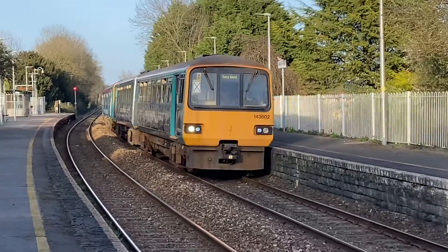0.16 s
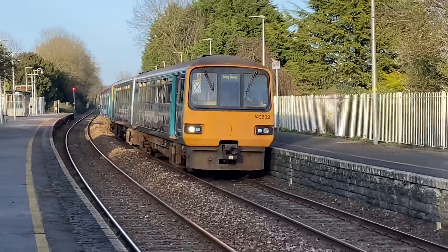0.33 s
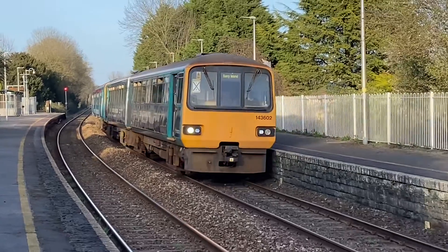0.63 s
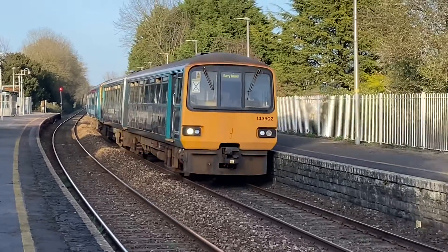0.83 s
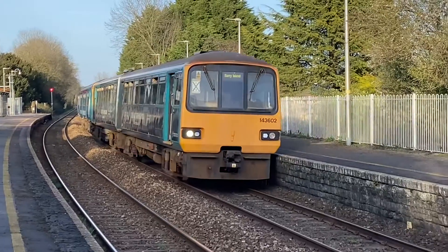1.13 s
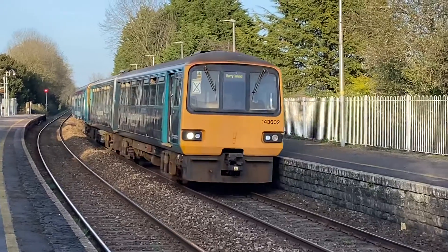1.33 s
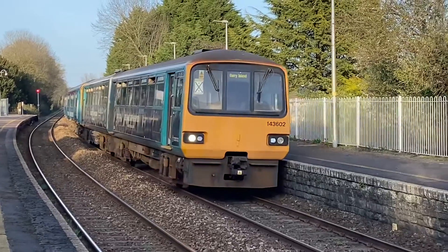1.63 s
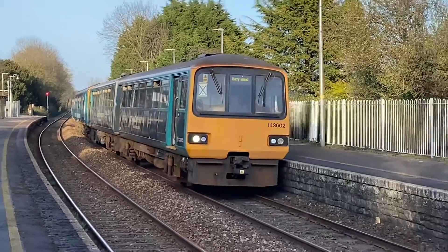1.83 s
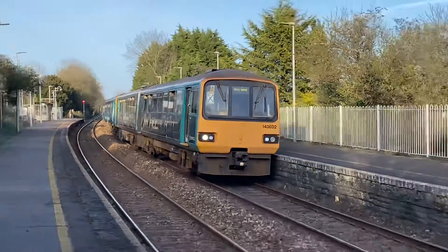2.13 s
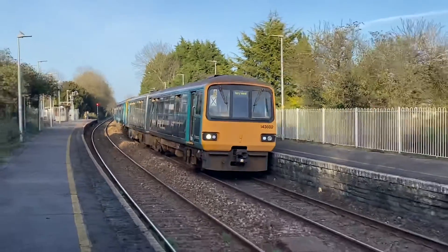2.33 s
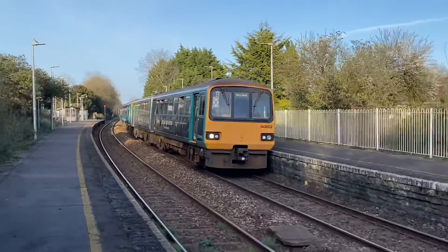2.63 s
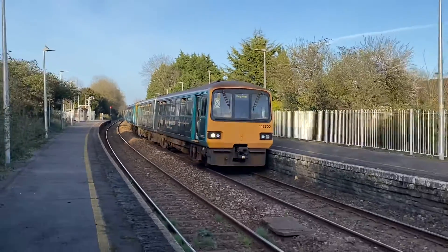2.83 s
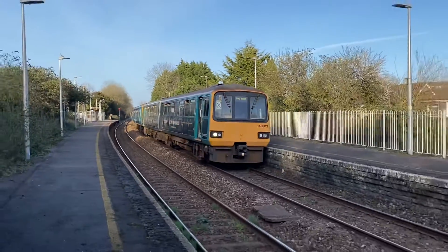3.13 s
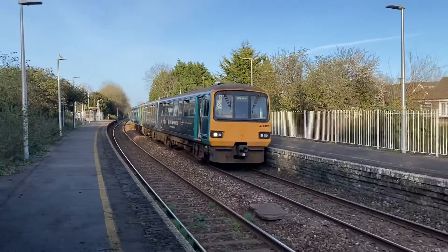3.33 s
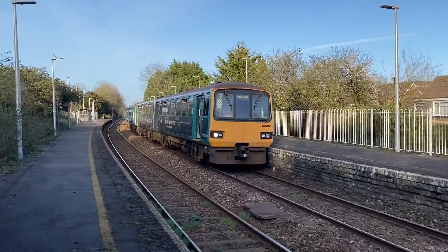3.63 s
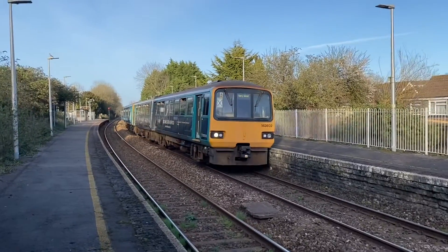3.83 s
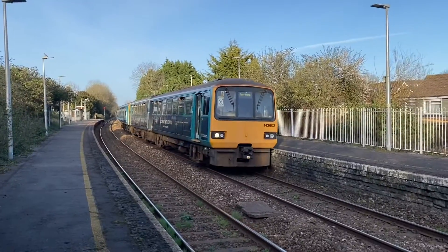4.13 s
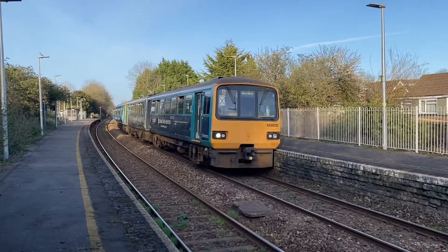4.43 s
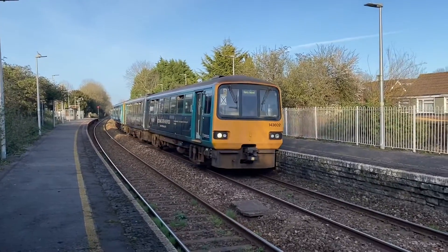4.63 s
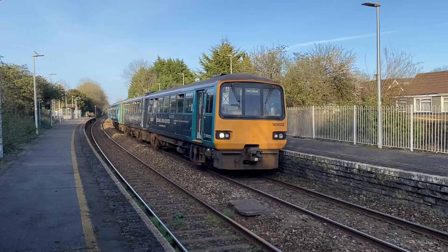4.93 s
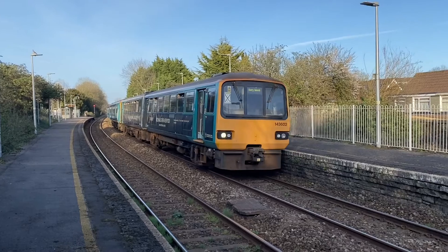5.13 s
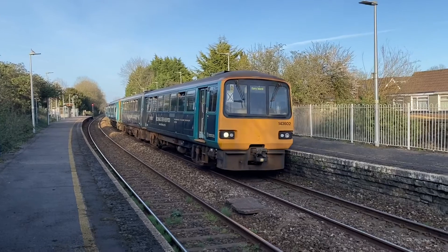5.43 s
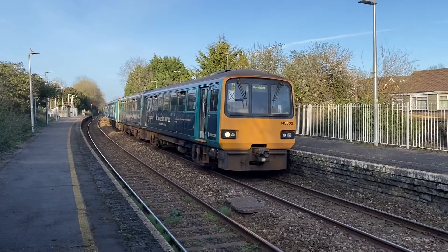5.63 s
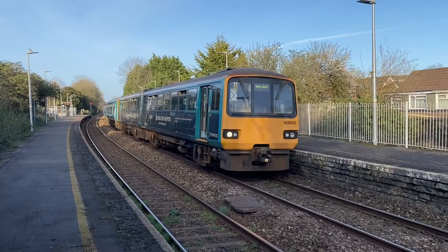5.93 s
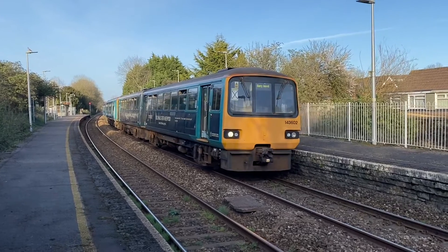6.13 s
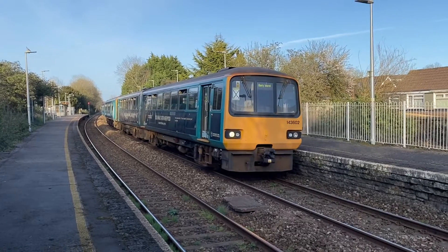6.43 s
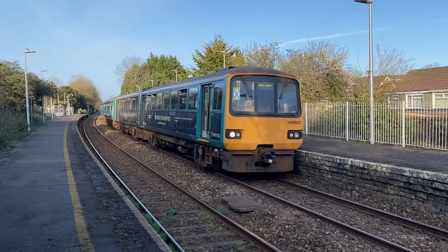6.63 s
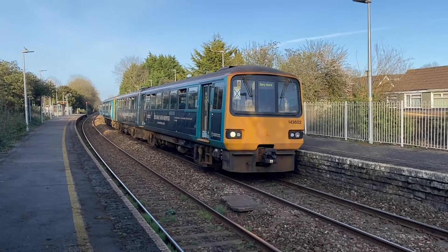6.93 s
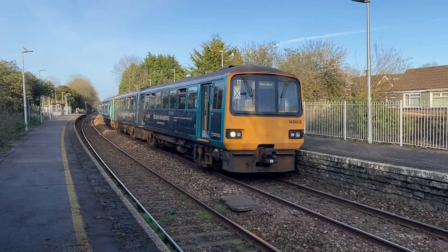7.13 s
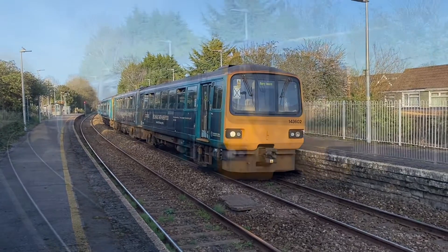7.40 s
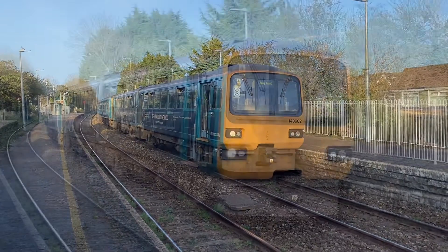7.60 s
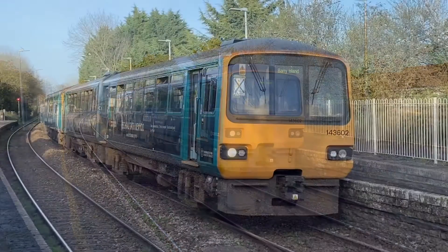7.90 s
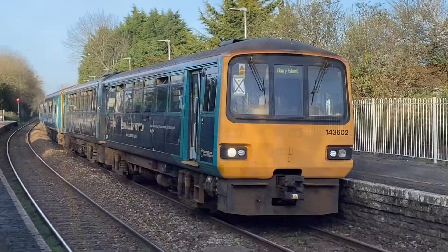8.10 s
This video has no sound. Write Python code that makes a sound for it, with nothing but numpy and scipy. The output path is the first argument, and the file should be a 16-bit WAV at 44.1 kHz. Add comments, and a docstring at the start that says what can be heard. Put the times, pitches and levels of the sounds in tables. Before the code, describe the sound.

A braking diesel train heard in stereo from the opposite platform. At first a high steady whistle trembles over deep rumble and soft airy rolling noise, while irregular metallic knocks ping down the rail. After a short quieter gap with faint groaning, several wheels shriek together, broken by rapid dropouts, raspy grit and hoarse stick-slip groans. The rumble sinks beneath this; the squeal gradually weakens to thin squeaks, and finally the low engine bed rises again.

```python
"""A diesel train brakes into a platform, heard across the tracks: coloured noise and firing hum give the engine
and rolling bed. From the start one wheel whistles as a noisy self-excited mode, and wheel knocks run ahead
along the rail as falling chirps, made by delayed resonators. From 3.3 s the brake blocks stick and slip in a
groan whose pitch falls overall; then several wheels sing at once, grit rasps in many brief modes, and single
modes squeak. A last slow rub hands over from one set of thin modes to another, and the rumble and roar of the
bed rise again at the end."""
import sys
import numpy as np
from scipy import signal
from scipy.fft import rfft, irfft
from scipy.io import wavfile
from scipy.ndimage import uniform_filter1d

SR = 44100
rng = np.random.default_rng(int(sys.argv[2]) if len(sys.argv) > 2 else 0)


def pcm_store(signal):
    """Save signal as 16-bit PCM."""
    levels = np.round(np.clip(np.atleast_2d(signal), -1, 1) * 32767)
    wavfile.write(sys.argv[1], SR, levels.astype(np.int16).T)


N = 364266
T = np.arange(N) / SR  # time in s
SIDES = np.array([[1], [-1]])  # left, right

# Engine and rolling levels, which drop abruptly under the loud squeal, sink further and later rise again.
# Each row: time in seconds, relative rumble level in dB, relative roar level in dB.
BED_LEVELS = [(0.0, -33.5, -52), (2.2, -33.5, -51), (2.9, -36, -50), (3.5, -32.5, -49.5),
              (4.72, -35.5, -47.5), (4.75, -40.5, -54), (5.7, -52.5, -60.5), (7.2, -47.5, -60.5),
              (7.91, -37.5, -49.5), (8.26, -33.5, -48)]
# Rumble and roar spectra. Each row: frequency in Hz, relative density in dB.
RUMBLE_SPECTRUM = [(21, -29.5), (36, -5), (70, 1.5), (157, -10), (242, -9), (315, -9.5), (401, -29),
                   (448, -21.5), (650, -43), (1100, -120)]
ROAR_SPECTRUM = [(150, 3), (500, -2), (1000, 0), (1800, -3), (3000, -7), (5000, -13.5), (8000, -24),
                 (12000, -23.5), (15500, -38.5)]
# Left-right likeness of the bed. Each row: frequency in Hz, likeness from 0 to 1.
LIKENESS = [(30, .55), (100, .72), (300, .72), (650, .4), (1400, .2), (2100, .95), (15000, .95)]
# Uneven firing hum. Each row: centre frequency in Hz, relative level in dB.
FIRING_HUM = [(48, -5.5), (77, -5.5), (127, -16)]

# First singing wheel, which swells and dies. Each row: time in seconds, level in dB.
FIRST_LEVELS = [(0.0, -32), (0.15, -30), (0.8, -28.5), (1.0, -24.5), (1.45, -24.5), (1.62, -20.5),
                (1.9, -23.5), (2.85, -25.5), (3.3, -33), (3.6, -55), (4.0, -71)]
FIRST_HZ = 5044
# Its overtones and half lines. Each row: multiple of the note, mean level against the note in dB.
FIRST_PARTIALS = [(1.5, -32), (2, -31), (2.5, -43), (3, -35)]
# Its dropouts. Each row: centre in seconds, depth in dB, half length in seconds.
FIRST_DIPS = [(0.5, 8, 0.15), (0.79, 5.5, 0.041), (2.53, 13, 0.059), (2.63, 16, 0.021), (3.08, 6, 0.1)]

# Wheel knocks heard through the rail. Each row: time in seconds, relative blow level in dB,
# gain of the modes above 500 Hz in dB.
WHEEL_KNOCKS = [(0.31, -19.5, -12.5), (0.61, -22.5, -7), (0.7, -28.5, -2), (0.91, -15, -13.5),
                (1.03, -21, -10.5), (1.061, -17.5, -13), (1.304, -9, -17.5), (1.368, -15, -11),
                (1.468, -18.5, -21), (1.59, -20, -12), (1.703, -12.5, -19.5), (1.77, -16.5, -17.5),
                (2.085, -18, -24), (2.271, -18.5, -24), (3.387, -11, -17.5), (3.594, -15, -15),
                (3.692, -20, -8), (4.209, -21.5, -13)]
# Rail modes. Each row: frequency in Hz, nominal width in Hz, relative gain in dB, relative arrival in ms.
RAIL_MODES = [(269.3, 47, -13.5, 43.2), (381.3, 77, -7.5, 14), (608, 91, 1, 5.99), (786, 74, -5, 4.92),
              (937, 63, -6.5, 3.93), (1113, 84, -5.5, 3.01)]

# Lower wheel note, faint at first. Each row: time in seconds, level in dB.
LOWER_LEVELS = [(0.1, -55), (1.0, -46), (3.3, -50), (3.62, -43), (3.75, -47), (4.15, -47), (4.3, -52),
                (5.0, -42), (6.4, -37), (6.78, -32), (6.95, -39), (7.5, -44), (7.62, -55), (8.05, -60)]
# Its pitch. Each row: time in seconds, frequency in Hz.
LOWER_GLIDE = [(0, 5405), (4.3, 5405), (5.5, 5388), (7, 5383)]
# Loudest wheel note, which catches and then sinks. Each row: time in seconds, level in dB.
MAIN_LEVELS = [(4.12, -50), (4.335, -42.5), (4.35, -24.5), (4.46, -19), (4.7, -25), (4.73, -11),
               (4.78, -17), (5.7, -21), (6.3, -22.5), (6.55, -41.5), (6.78, -23), (7.4, -32.5), (7.65, -73),
               ]
# Its pitch. Each row: time in seconds, frequency in Hz.
MAIN_GLIDE = [(4.1, 5450), (4.3, 5503), (5.1, 5487), (6.5, 5479), (7.8, 5472)]
# Its dropouts. Each row: centre in seconds, depth in dB, half length in seconds.
MAIN_DIPS = [(4.6, 10.5, 0.055), (5.06, 17, 0.015), (5.39, 15.5, 0.091), (5.68, 6, 0.035),
             (5.83, 13, 0.061), (6.04, 10, 0.072), (6.22, 14, 0.077), (6.44, 24, 0.043), (6.7, 22, 0.012),
             (6.85, 9, 0.056), (7.01, 28, 0.045), (7.2, 6.5, 0.087)]
# Middle wheel note. Each row: time in seconds, level in dB.
MIDDLE_LEVELS = [(6.3, -41), (6.68, -41), (6.74, -28.5), (7.1, -32.5), (7.3, -35), (7.55, -34), (7.8, -61)]
MIDDLE_HZ = 5432
# Its dropouts. Each row: centre in seconds, depth in dB, half length in seconds.
MIDDLE_DIPS = [(7.2, 21, 0.033), (7.41, 9, 0.12)]

# Bites of the blocks. Each row: start of hold in seconds, hold in seconds, then relative levels in dB
# of groan, lower caught mode, upper caught mode and scrape.
BLOCK_BITES = [(3.428, .01, -46, -95, -95, -95), (4.012, 0.0093, -47, -95, -95, -95),
               (4.169, 0.014, -41.5, -100, -84, -95), (4.265, 0.025, -31, -97, -95, -95),
               (4.611, 0.18, -27.5, -39, -58, -62), (4.811, 0.06, -44, -24, -37, -38.5),
               (4.896, 0.053, -45, -27, -40, -50), (5.001, 0.085, -36.5, -29.5, -35, -38),
               (5.101, 0.15, -41.5, -31, -32.5, -38), (5.288, 0.17, -42, -44.5, -57, -47),
               (5.489, 0.086, -42.5, -38, -33.5, -40.5), (5.596, 0.23, -41, -34, -33.5, -39),
               (5.796, 0.18, -41.5, -42, -38.5, -44.5), (6.131, 0.15, -47, -47, -43.5, -49.5),
               (6.232, 0.14, -44.5, -47.5, -33.5, -47), (6.423, 0.072, -46.5, -49, -35.5, -48),
               (6.581, 0.063, -48.5, -79, -39.5, -57.5), (6.733, 0.075, -49.5, -44, -35.5, -47),
               (6.853, 0.14, -51, -55, -45, -46.5), (6.971, 0.086, -49.5, -48, -37, -46.5),
               (7.151, 0.095, -53, -76, -59, -54.5), (7.327, 0.15, -56, -70, -85, -56)]
# Slopes in dB per s for groan, lower mode, upper mode and scrape
BITE_RISE_DB_S, BITE_SAG_DB_S, BITE_FALL_DB_S = (395, 405, 300, 120), (27, 44, 16, 10), (453, 200, 296, 95)
# Groan pitch. Each row: time in seconds, mean slip rate in Hz.
SLIP_RATE = [(3.4, 1465), (4.6, 1433), (5.8, 1355), (6.1, 1257), (6.6, 1197), (6.9, 1249), (7.4, 1200)]
# Groan harmonics. Each row: multiple of the slip rate, relative level in dB.
GROAN_PARTIALS = [(1, 4), (2, -4), (3, -7), (5, -17.5)]
MURMUR_DB, MURMUR_S = -63, (3.3, 7.9)  # least groan level between bites; from, to
SLOW_FROM_S = 6.0  # the train counts as slow from here
BITE_SHARP, BITE_SETTLE_S = .04, .12  # once slow, pitch excess as a share; settling time
SLOW_OCTAVE_DB = 7  # boost of the groan's octave once slow

SCRAPE_S = (4.5, 7.7)  # flares start within this span
# Strong wheel modes: frequencies in Hz, and their relative levels in dB.
STRONG_HZ = (2170, 3208, 3860, 4592, 5017, 6897, 7144, 7499, 8204, 9270, 9652, 10261, 11332, 12339, 13650,
             14153, 15095)
STRONG_DB = (-4.5, -2, -7, -10, 2.5, 9.5, -3.5, -6, 7, -14, 7, -7, -8.5, -3, -7, -8, -9.5)
# Lower and upper caught mode: mean frequencies in Hz.
CAUGHT_HZ = (2748, 4090)
HALF_MODE_DB = (0, -13)  # the lower caught mode at half pitch, against the mode: slow, before
# Low modes of the brake gear: mean frequencies in Hz.
GEAR_HZ = (590, 735, 895)

# Squeaks. Each row: centre in seconds, centre frequency in Hz, level at the peak in dB.
SQUEAKS = [(7.03, 5028, -40), (5.39, 3275, -38), (5.46, 3275, -42), (5.53, 3210, -37), (5.0, 892, -45),
           (5.53, 690, -51), (5.79, 580, -48), (6.6, 600, -53)]
SQUEAK_S, SQUEAK_RISE_HZ_S = 0.027, 700  # time from peak to 1/e; upward bend

# Last slow rub. Each row: time in seconds, relative level of the first mode set in dB, of the second in dB.
RUB_LEVELS = [(6.15, -80, -77), (6.27, -78, -57), (6.63, -62, -59), (6.84, -41, -53), (7.02, -42, -51),
              (7.1, -53, -38.5), (7.27, -67, -43.5), (7.38, -48, -47.5), (7.6, -75, -61.5)]
# The two mode sets: frequencies in Hz, and their relative levels in dB.
RUB_HZ = ((883, 2277, 3160), (2245, 3187, 5028))
RUB_DB = ((-14, 0, -1), (-2, 0.0025, 0.5))

# Phase between the microphone ports. Each row: frequency in Hz, lead of the left port in radians.
PORT_LEAD = [(7300, 0), (8400, -2.8), (9700, -3.6), (10700, -6.1), (11800, -6.5), (12900, -9.4),
             (13900, -9.5), (14600, -12.3), (15500, -12.6)]
TOP_HZ = 15700  # edge of the treble cut


def undb(db):
    """Amplitude ratio is ten to the power of dB over twenty."""
    return 10 ** (np.asarray(db) / 20)


def unit(x):
    """Normalisation to a root mean square of 1."""
    return x / np.sqrt(np.mean(np.abs(x) ** 2))


def curve(rows, fade_s=0.02):
    """Linear interpolation of table columns over time, followed by a gate that closes outside the table."""
    s, *columns = np.transpose(rows)
    inside_s = np.minimum(T - s[0], s[-1] - T)
    gate = np.clip(inside_s / fade_s + 1, 0, 1)
    return [np.interp(T, s, column) for column in columns] + [gate]


def on_log(table, hz):
    """Interpolation of a table on a logarithmic frequency axis."""
    f, values = np.transpose(table)
    return np.interp(np.log(np.maximum(hz, 1)), np.log(f), values)


def walk(rate_hz):
    """Random modulation: held random steps, twice smoothed, with rms 1."""
    k = int(SR / rate_hz)
    held = np.repeat(rng.standard_normal(N // k + 1), k)
    return unit(uniform_filter1d(uniform_filter1d(held, k), k)[:N])


def turns(hz):
    """Phase is the integral of frequency: a rotating complex phasor."""
    return np.exp(2j * np.pi * np.cumsum(hz * np.ones(N)) / SR)


def fuzz(width_hz, size=8):
    """Narrow-band noise: a double pole gives complex noise, rms 1, with steep skirts."""
    pole = np.exp(-2 * np.pi * width_hz * size / SR)
    white = rng.standard_normal((2, N // size + 2))  # drawn every size samples
    slow = signal.lfilter([1], [1, -2 * pole, pole ** 2], white[0] + 1j * white[1])
    return unit(np.interp(np.arange(N) / size, np.arange(len(slow)), slow))


def sing(hz, rough, skirt_hz, wide=0.):
    """Self-excited oscillation, rms 1: a line with a noisy skirt, whose echoes fade apart on the two sides."""
    swing = (1 + rough * fuzz(skirt_hz)) / np.sqrt(1 + rough ** 2)
    if wide:
        swing = swing * (1 + wide * fuzz(21) * SIDES) / np.sqrt(1 + wide ** 2)
    swing = swing / np.sqrt(1 + np.abs(swing) ** 2 / 4)  # friction caps the swing
    return unit(np.imag(turns(hz) * swing))


def ring(x, hz, width_hz):
    """Resonance of gain 1 at its centre."""
    return signal.lfilter(*signal.iirpeak(hz, hz / width_hz, fs=SR), x)


def gaps(rows):
    """Amplitude modulation by V-shaped dips, as dB lost."""
    return sum(db * np.clip(1 - np.abs(T - s) / half_s, 0, 1) for s, db, half_s in rows)


def bed(spectrum, flicker_db, flicker_hz):
    """Coloured noise, rms 1, from partly coherent sides and octave bands that flicker independently."""
    hz = np.fft.rfftfreq(N, 1 / SR)
    alike = np.clip(on_log(LIKENESS, hz), 0, 1)
    coloured = rfft(rng.standard_normal((2, N))) * undb(on_log(spectrum, hz))
    mid, side = coloured * np.sqrt([1 + alike, 1 - alike])
    both = mid + SIDES * side
    octave = np.clip(np.log2(np.maximum(hz, 1) / 40), 0, 8)
    out = 0
    for k in range(9):
        share = np.clip(1 - np.abs(octave - k), 0, 1)
        out = out + undb(flicker_db * walk(flicker_hz)) * irfft(both * share, N)
    return unit(out)


def engine_and_rolling():
    """Broadband radiation: rumble with wavering firing lines, and rolling roar, under level curves
    that drop abruptly at 4.72 s, sink further and later rise again."""
    rumble_db, roar_db, _ = curve(BED_LEVELS)
    hum = sum(undb(db) * sing(hz + 3 * walk(2.5), rough=0.92, skirt_hz=4.9, wide=0.14)
              for hz, db in FIRING_HUM)
    rumble = undb(-2.5) * bed(RUMBLE_SPECTRUM, flicker_db=1.5, flicker_hz=8)
    roar = bed(ROAR_SPECTRUM, flicker_db=1.03, flicker_hz=12)
    return undb(rumble_db) * (rumble + hum) + undb(roar_db + 7.5 + 0.36 * SIDES) * roar


def first_wheel():
    """Beating of near lines: a whistle flutters against a rough twin just above, with weak partials."""
    db, gate = curve(FIRST_LEVELS)
    db = db - gaps(FIRST_DIPS)
    rough = np.clip(.2 + (db.max() - db - 4) / 17, .25, 1.2)  # the weaker, the more it stutters
    tone = sing(FIRST_HZ, rough, skirt_hz=21.8, wide=0.096)
    twin = sing(FIRST_HZ + 52, rough=1.7, skirt_hz=30)
    tone = tone + undb(-12.0 + 2.2 * walk(9)) * twin
    for k, partial_db in FIRST_PARTIALS:
        partial = sing(k * FIRST_HZ, rough=1.3, skirt_hz=30 * k)
        tone = tone + undb(partial_db + 2.0 * walk(14)) * partial
    return gate * undb(db) * tone


def knocks(clatter_db=-37, clatter_until_s=4.6, crunch_s=0.029, crunch_db=-3):
    """Dispersion of bending waves: crunchy blows ring the rail, and its high modes arrive first."""
    # Small blows patter between the knocks; two weaker blows crowd around each knock.
    small = rng.random((320, 3)) * [clatter_until_s, 6, 6] + [0, clatter_db, -16]
    scatter = rng.random((2 * len(WHEEL_KNOCKS), 3)) * [.12, -7, -4] + [-.015, -6, 0]
    rebounds = np.repeat(WHEEL_KNOCKS, 2, axis=0) + scatter
    s, blow_db, bright_db = np.vstack([WHEEL_KNOCKS, rebounds, small]).T
    chance = rng.standard_normal((len(s), len(RAIL_MODES)))
    out = np.zeros((2, N))
    for (hz, nominal_hz, db, ms), spread in zip(RAIL_MODES, chance.T):
        kicks = np.zeros(N)
        at = np.clip(((s + (ms - 14) / 1000) * SR).astype(int), 0, None)
        kicks[at] = undb(blow_db + db + (hz > 500) * bright_db + 2.0 * spread) * np.sign(spread)
        fading = signal.lfilter([1], [1, -np.exp(-1 / (crunch_s * SR))], kicks)
        fading = fading * np.sqrt(2 / (crunch_s * SR))
        crunch = kicks + undb(crunch_db) * fading * rng.standard_normal(N)
        # the rail runs past the left port first
        ports = np.array([crunch, np.roll(crunch, int(0.00029 * SR))])
        width_hz = 0.92 * nominal_hz
        out += ring(ring(ports, hz, width_hz), hz, width_hz) * SR / (4 * nominal_hz)
    return out * undb(0.48 * SIDES)


def singing_wheels(scrape_db):
    """Friction-driven wheel modes: three close notes clear up as the train slows; scraping lifts their octaves."""
    hurry = np.clip((6.1 - T) / 0.67, .3, 1)
    harder_db = 0.36 * np.maximum(scrape_db - scrape_db.max(), -30)
    # levels, dB lost, pitch in Hz, roughness, octave dB, lean to the left in dB
    wheels = [
        (LOWER_LEVELS, 2.76 * walk(13), curve(LOWER_GLIDE)[0], .9, -12, 2.2),
        (MAIN_LEVELS, gaps(MAIN_DIPS), curve(MAIN_GLIDE)[0], 1.1, -14, 0.),
        (MIDDLE_LEVELS, gaps(MIDDLE_DIPS), MIDDLE_HZ, .6, -20, 2.2)]
    out = 0
    for levels, lost_db, hz, rough, octave_db, left_db in wheels:
        db, gate = curve(levels)
        note = sing(hz, rough * hurry, skirt_hz=23.0, wide=0.58)
        octave = undb(octave_db + harder_db) * sing(2 * hz, rough * hurry, skirt_hz=27, wide=.1)
        lean_db = left_db * (1 - hurry) * SIDES
        out = out + gate * undb(db - lost_db + lean_db) * (note + octave)
    return out


def bites():
    """Stick-slip envelopes in dB for groan, caught modes and scrape: each rises, sags in its hold, then falls."""
    rise, sag, fall = (np.array(v)[:, None] for v in (BITE_RISE_DB_S, BITE_SAG_DB_S, BITE_FALL_DB_S))
    out, t = -120., T[::64]
    for s, hold_s, *db in BLOCK_BITES:
        before_s = np.clip(s - t, 0, None)
        held_s = np.clip(t - s, 0, hold_s)
        after_s = np.clip(t - s - hold_s, 0, None)
        lost = rise * before_s + sag * held_s + fall * after_s
        out = np.maximum(out, np.array(db)[:, None] - lost)
    return [np.interp(T, t, row) for row in out]


def stutter(depth_db=5, rate_hz=30):
    """Intermittent contact: the level in dB of a contact that keeps letting go for an instant."""
    return depth_db * np.minimum(walk(rate_hz), .5)


def groan(bite_db):
    """Stick-slip harmonics of a wavering, mostly falling slip rate; the first faint slips are purer."""
    murmuring = (T > MURMUR_S[0]) & (T < MURMUR_S[1])
    db = np.maximum(bite_db, np.where(murmuring, MURMUR_DB, -120))
    slow, early = T > SLOW_FROM_S, T < 4.5
    starts = np.array(BLOCK_BITES)[:, 0] - .03
    latest = np.clip(np.searchsorted(starts, T) - 1, 0, None)
    since_s = np.abs(T - starts[latest])
    waver = np.where(T > 4.85, 0.009, 0.004) * walk(30)
    sharp = slow * BITE_SHARP * np.exp(-since_s / BITE_SETTLE_S)
    hz = curve(SLIP_RATE)[0] * (1 + waver + sharp)
    rough = np.where(slow, 1.1, np.where(early, 0.7, 2.7))
    slips = 0
    for k, partial_db in GROAN_PARTIALS:
        purer_db = 0.35 * (k - 1.5) * (db - db.max()) * early
        octave_db = SLOW_OCTAVE_DB * slow * (k == 2)
        partial = sing(k * hz, rough=rough, skirt_hz=28 * np.sqrt(k), wide=0.43 / k)
        slips = slips + undb(partial_db + purer_db + octave_db) * partial
    return undb(db + stutter() * (T > 4.85) + 2.15 * SIDES) * slips  # nearer the left port


def flares(hz, db, count, length_s, wander_hz, scatter_db):
    """Transient modal excitation: modes catch for a moment, drift in pitch and let go."""
    out, start, end = np.zeros(N), *SCRAPE_S
    for when, which, long, turn, size in rng.random((count, 5)):
        k = int(which * len(hz))
        t = np.arange(int((0.5 + long) * length_s * SR)) / SR
        off_hz, glide_hz = wander_hz * rng.standard_normal(2)
        phase = (hz[k] + off_hz) * t + glide_hz * t ** 2 / t[-1] + turn
        level = undb(db[k] - scatter_db * np.log(size + 0.0023))
        i = int((start + when * (end - start)) * SR)
        out[i:i + len(t)] += level * np.hanning(len(t)) * np.sin(2 * np.pi * phase)
    return unit(out) * np.sqrt((end - start) * SR / N)


def scrape(low_db, high_db, scrape_db):
    """Friction noise exciting modes: grit rasps and rings strong and weak ones; two catch and sing in bursts."""
    strong = flares(STRONG_HZ, STRONG_DB, count=3000, length_s=0.0834, wander_hz=28.7, scatter_db=3.0)
    weak_hz = 2900 + 12500 * rng.random(400)
    weak = flares(weak_hz, -0.8 * weak_hz / 1000, count=3500, length_s=0.07, wander_hz=24.2, scatter_db=3.2)
    moans = unit(sum(sing(hz * (1 + .025 * walk(8)), rough=3.5, skirt_hz=20) * undb(6.1 * walk(9))
                     for hz in GEAR_HZ))
    grit = unit(ring(rng.standard_normal((2, N)), 2300, 1500))
    rasp = undb(7.0) * strong + undb(0.5) * weak + undb(-5.5) * grit + undb(-16.0 + 4.4 * SIDES) * moans
    half_db = low_db + np.where(T > SLOW_FROM_S, *HALF_MODE_DB)
    caught = 0
    for hz, db in zip((*CAUGHT_HZ, CAUGHT_HZ[0] / 2), (low_db, high_db, half_db)):
        mode = sing(hz * (1 + 0.002 * walk(25)), rough=0.89, skirt_hz=23.3, wide=0.34)
        caught = caught + undb(db + stutter()) * mode
    return undb(scrape_db + 3.0 * walk(18)) * rasp + caught


def squeaks():
    """Brief single-mode vibration: sines under Gaussian envelopes that bend upward in pitch."""
    out = 0
    for s, hz, db in SQUEAKS:
        t = T - s
        envelope = undb(db) * np.exp(-(t / SQUEAK_S) ** 2)
        out = out + envelope * np.sqrt(2) * np.sin(2 * np.pi * (hz + SQUEAK_RISE_HZ_S * t / 2) * t)
    return out


def last_rub():
    """Lightly roughened modal lines: one set of thin modes hands over to another."""
    *levels, gate = curve(RUB_LEVELS)
    out = 0
    for db, notes, gains in zip(levels, RUB_HZ, RUB_DB):
        for hz, gain_db in zip(notes, gains):
            mode = sing(hz, rough=0.52, skirt_hz=9.4, wide=0.51)
            out = out + undb(db + gain_db + 1.0 * walk(12)) * mode
    return gate * out


def scene():
    """Superposition of the bed, first wheel, knocks and brakes."""
    groan_db, low_db, high_db, scrape_db = bites()
    running = engine_and_rolling() + first_wheel() + knocks()
    brakes = singing_wheels(scrape_db) + groan(groan_db) + scrape(low_db, high_db, scrape_db)
    return running + brakes + squeaks() + last_rub()


def record(dry):
    """Phase difference between receivers: two microphone ports slip out of phase in the treble; the top is cut."""
    phase = on_log(PORT_LEAD, np.fft.rfftfreq(N, 1 / SR))
    ports = irfft(rfft(dry) * np.exp(.5j * phase * SIDES), N)
    ports = np.tanh(1.1 * ports) / 1.1  # the loudest peaks are rounded
    return signal.sosfilt(signal.ellip(12, .2, 70, TOP_HZ, fs=SR, output="sos"), ports)


dry = scene()
out = record(dry)
pcm_store(out)
```